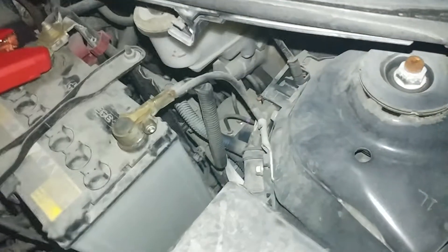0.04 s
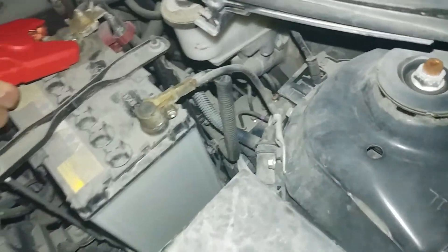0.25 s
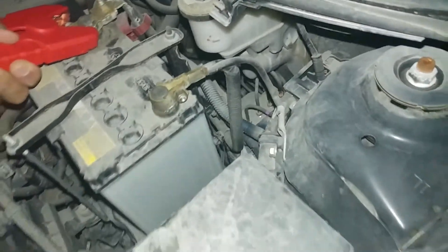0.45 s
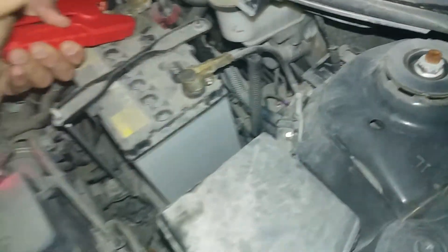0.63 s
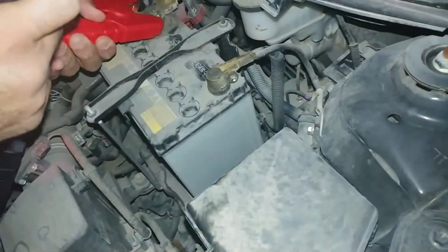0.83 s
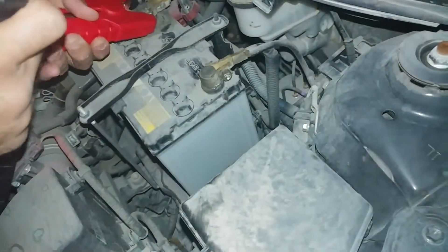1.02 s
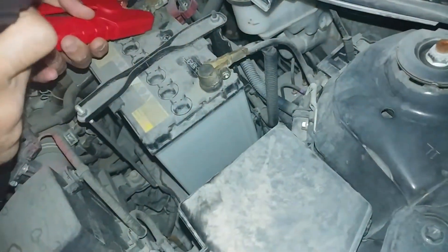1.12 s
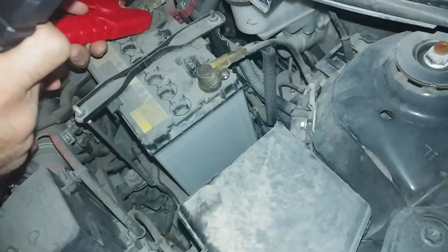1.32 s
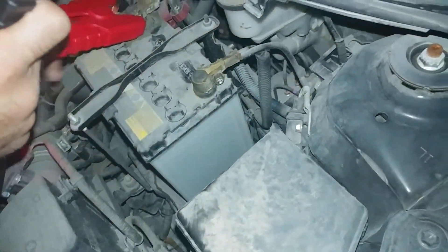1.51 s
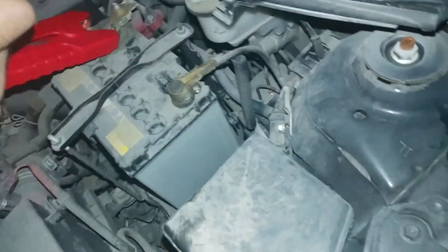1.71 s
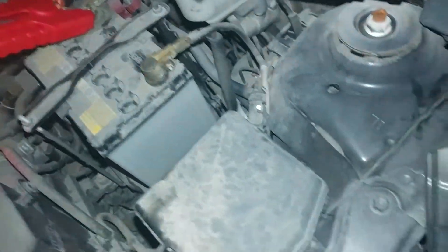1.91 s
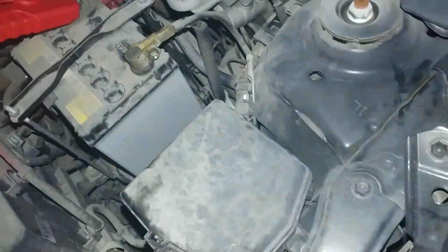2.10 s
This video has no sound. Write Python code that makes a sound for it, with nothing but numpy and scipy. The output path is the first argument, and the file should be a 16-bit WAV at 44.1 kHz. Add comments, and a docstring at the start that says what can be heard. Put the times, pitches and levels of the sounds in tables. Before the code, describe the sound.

Close to the microphone, a jumper clamp's jaws close with one sharp, briefly ringing snap. The grip scuffs, small taps and a knock sound on the car battery, and a cable slides faintly, with a low rumble underneath.

```python
"""Jumper clamp over an engine bay

The sprung jaws of a plastic clamp slip and snap shut once, ringing briefly and shaking the panels.
Light taps and a dull knock ring the battery case. The grip scuffs; a thin sliding hiss, probably
the cable, whistles faintly. A low rumble and a weak hum lie under it all."""
import sys
import numpy as np
from scipy import signal
from scipy.fft import rfft, irfft, next_fast_len
from scipy.io import wavfile
from scipy.ndimage import uniform_filter1d

SR = 44100
rng = np.random.default_rng(int(sys.argv[2]) if len(sys.argv) > 2 else 0)


def to_wav(s):
    """Save 16-bit WAV."""
    ch = np.atleast_2d(s).T  # columns
    pcm = np.round(np.clip(ch, -1, 1) * 32767)  # PCM
    wavfile.write(sys.argv[1], SR, pcm.astype(np.int16))


N = 94815
TIME_S = np.arange(N) / SR

# left-right correlation of the diffuse sound: f/Hz, coefficient
DIFFUSE_CORRELATION = [(60, 1), (130, 0.9), (290, .83), (640, 0.24), (1400, 0.096), (3000, 0.28),
                       (15000, -0.84)]
# rumble, then its deepest part: f/Hz, relative density/dB
RUMBLE_SPECTRUM = [(110, -12), (174, -19), (223, -17), (256, -19), (305, -15), (347, -22.5), (390, -20),
                   (482, -25.5), (792, -27), (1230, -38), (1860, -43), (2590, -49), (6000, -55.5),
                   (16000, -59)]
BASS_SPECTRUM = [(38, -6.5), (50, -2.5), (62, -2), (80, 1), (100, 1), (125, -5.5)]
# swell of deep rumble and hum: t/s, level/dB
BASS_ENVELOPE = [(0, -45.5), (0.09, -54.5), (0.14, -42), (0.2, -51.5), (0.27, -41.5), (0.34, -47),
                 (0.41, -46), (0.48, -50.5), (0.535, -43), (0.635, -54), (0.69, -44), (0.89, -52.5),
                 (0.98, -43.5), (1.11, -47), (1.25, -46), (1.5, -53), (1.8, -50), (2.15, -48.5)]

# sliding hiss: t/s, middle level/dB, top level/dB
SLIDE_ENVELOPE = [(0, -67.5, -70), (0.11, -77.5, -84), (0.19, -64.5, -74), (0.3, -65.5, -78.5),
                  (0.47, -82, -84), (0.76, -79.5, -80), (0.82, -73.5, -83), (0.98, -64, -82),
                  (1.05, -72.5, -72.5), (1.12, -69.5, -66.5), (1.22, -66, -63), (1.42, -66.5, -62),
                  (1.61, -73, -79), (1.76, -73.5, -76.5), (1.87, -77, -85.5), (2.15, -82, -91)]
# its middle and top bands: f/Hz, relative density/dB
SLIDE_MIDDLE_SPECTRUM = [(2000, -7.5), (3800, -5), (4400, 0.5), (5100, -5.5), (6200, -1.5), (7400, -5.5),
                         (8300, -5.5), (9250, 2.5), (10300, -10), (12000, -26.5)]
SLIDE_TOP_SPECTRUM = [(8000, -25), (10500, -13), (12500, -2.5), (13700, -1.5), (14600, 0.5), (15800, -4.5)]
# friction resonances: peak t/s, length/s, f/Hz, half-width/Hz, level/dB
SLIDE_WHISTLES = [(1.172, .28, 4360, 260, -72.5), (1.181, 0.21, 9400, 330, -68.5),
                  (1.384, 0.31, 9010, 699, -66.5), (1.537, 0.18, 6050, 297.6, -75),
                  (1.553, .24, 14300, 700, -68), (1.696, 0.21, 12750, 900, -71.5)]
# grip on plastic: t/s, level/dB
SCUFF_ENVELOPE = [(0, -63.5), (0.1, -73), (0.29, -58), (0.315, -49), (0.342, -66), (0.362, -48.5),
                  (0.386, -44.5), (0.408, -52), (0.418, -62), (0.436, -57), (0.47, -73.5), (0.76, -74),
                  (0.82, -61.5), (0.89, -66), (0.98, -61), (1.03, -62), (1.08, -77.5)]
# scuff, soft bump: f/Hz, relative density/dB
SCUFF_SPECTRUM = [(300, -15), (800, -4), (1080, -3), (1400, 7), (1650, 2), (1950, 5), (3300, -14),
                  (6000, -23), (9500, -23), (11000, -32.5), (16000, -34.5)]
THUD_SPECTRUM = [(110, 0), (220, -1), (330, 0), (480, -10)]
# soft bumps: t/s, level/dB
THUD_HITS = [(0.283, -40), (0.685, -39), (1.152, -45), (1.195, -47)]

# clamp on battery, the last a knock: t/s, clack level/dB, tick level/dB, case gain/dB
TAP_HITS = [(0.149, -53, -57, -34), (0.4221, -42, -70, -12), (0.6798, -37.5, -58, -19),
            (0.6898, -46, -70, -25), (0.76, -60.5, -63.5, -35), (0.9936, -45.5, -46, 1.5)]
# clack, tick, dull after-ring: f/Hz, relative density/dB
CLACK_SPECTRUM = [(150, -0.5), (350, -3.5), (700, -11), (1100, -9), (1600, 5.5), (2100, -5), (2800, -18.5),
                  (5000, -29), (9000, -37.5)]
TICK_SPECTRUM = [(1500, -4), (3000, -2.5), (5500, 5.5), (7500, -2), (8700, 14), (10000, 16), (11000, 2),
                 (12500, 4), (16000, -10)]
AFTER_RING_SPECTRUM = [(300, -6), (500, 5), (800, 5.5), (1200, -9), (2200, -20.5), (4000, -27.5)]
# battery case: f/Hz, level/dB, T60/s
CASE_MODES = [(505, -42, 0.05), (587, -38, 0.09), (694, -43, 0.07), (851, -39, 0.075), (1141, -54, 0.06)]

# panels and cavities: f/Hz, level/dB, T60/s, delay/s
PANEL_MODES = [(58, -33.5, 0.19, 0.012), (250, -29, 0.15, .011), (280, -30, 0.11, .012),
               (385, -41, 0.14, .01), (500, -32, 0.075, .001), (666, -33, .08, .014), (1000, -27, .06, 0)]
# bay reflections, far tail: f/Hz, relative density/dB
BAY_SPECTRUM = [(200, -9), (600, -4), (1200, -1), (2000, 1), (3200, -10.5), (5500, -9.5), (8000, -11.5),
                (9300, -9), (10500, -40), (14500, -28), (16000, -35.5)]
FAR_TAIL_SPECTRUM = [(200, 2.5), (1000, 2.5), (2000, -0.5), (3500, -7.5), (9500, -13.5), (11000, -28.5),
                     (16000, -26.5)]
# decay of the reflections: f/Hz, T60/s
BAY_DECAY = [(200, 0.14), (1000, 0.085), (2000, .08), (5000, 0.065), (14000, 0.097)]

# slip, then slam: t/s, ring gain/dB, slope away from the jaw pitch/(dB/octave), chatter level/dB
JAW_SNAPS = [(0.2247, -7.5, -7, -29), (0.2288, -5, -1, -14.5)]
# clamp shell: f/Hz, left level/dB, right level/dB, T60/s
CLAMP_MODES = [(1037, -20.5, -31, .04), (1144, -26.5, -22, .05), (1430, -26, -20, .05),
               (1640, -23.5, -16, 0.062), (1870, -24.5, -6, 0.055), (2060, -16.5, -4.5, 0.032),
               (2308, -7, -14.5, .035), (2550, -13, -22, 0.031), (2790, -24, -26, 0.047),
               (2952, -18, -22.5, 0.022), (4900, -12, -20, .018), (5520, -19, -13, 0.022),
               (6530, -19, -15.5, .014)]
# teeth meet and rebound: t/s, left level/dB, right level/dB
TOOTH_HITS = [(0.22860, -10, -14.5), (0.2289, -4, -3), (0.2294, -10.5, -8), (0.2302, -9, -11),
              (0.2311, -13, -14)]
# clicks and chatter of the teeth: f/Hz, relative density/dB
TOOTH_SPECTRUM = [(300, -25), (700, -12.5), (1340, -10), (1750, -4.5), (2250, 0), (3100, -11), (4100, -6.5),
                  (5600, -3.5), (6600, -5), (7500, -10.5), (8600, -5), (9700, -6.5), (10500, -34),
                  (12500, -26), (14200, -15.5), (16000, -26)]

HAND_LAG_S = .00036   # the hand is nearer the left microphone


def amp(db):
    """Decibels to gain."""
    return 10 ** (np.asarray(db) / 20)


def unit_rms(x):
    """Scale to unit power."""
    return x / np.sqrt(np.mean(x ** 2) + 1e-20)


def at_hz(table, hz):
    """Interpolate a table over log frequency."""
    table_hz, values = np.transpose(table)
    return np.interp(np.log(np.maximum(hz, 1)), np.log(table_hz), values)


def in_time(table):
    """Interpolate each column linearly over time."""
    times_s, *columns = np.transpose(table)
    return [np.interp(TIME_S, times_s, column) for column in columns]


def drift(rate_hz):
    """Low-passed random wander, unit RMS."""
    pole = np.exp(-2 * np.pi * rate_hz / SR)
    wander = signal.lfilter([1], [1, -2 * pole, pole * pole], rng.standard_normal(N + SR))
    return unit_rms(wander[SR:])


def noise(spectrum, correlation, lag_s=0, left_db=0):
    """Unit-RMS stereo noise, falling 12 dB/octave outside its spectrum; the right side may lag."""
    size = next_fast_len(N)
    hz = np.arange(size // 2 + 1) * SR / size + 1
    skirts = np.minimum(hz / spectrum[0][0], 1) ** 2 * np.minimum(spectrum[-1][0] / hz, 1) ** 2
    gain = amp(at_hz(spectrum, hz)) * skirts
    alike = np.clip(at_hz(correlation, hz) if np.ndim(correlation) else correlation, -1, 1)
    mid, side = rfft(rng.standard_normal((2, size))) * gain
    mid, side = mid * np.sqrt(1 + alike), side * np.sqrt(1 - alike)
    left = (mid + side) * amp(left_db)
    right = (mid - side) * np.exp(-2j * np.pi * hz * lag_s)
    return unit_rms(irfft(np.array([left, right]), size)[:, :N])


def decay(start_s, db, t60_s):
    """Envelope of a blow: sudden start, exponential fall."""
    return (TIME_S >= start_s) * amp(db - 60 * np.clip((TIME_S - start_s) / t60_s, 0, 3))


def ring(start_s, hz, db, t60_s):
    """One struck mode."""
    return decay(start_s, db, t60_s) * np.sin(2 * np.pi * hz * (TIME_S - start_s))


def click(spectrum, size=4096):
    """Minimum-phase pulse of a given spectrum, peak 1."""
    hz = np.arange(size // 2 + 1) * SR / size
    cepstrum = irfft(np.log(amp(at_hz(spectrum, hz))))
    cepstrum[1:size // 2] *= 2
    cepstrum[size // 2 + 1:] = 0
    pulse = irfft(np.exp(rfft(cepstrum)))
    return pulse / np.abs(pulse).max()


def rumble(steady_db=-51, deep_gain_db=-1, hum_gain_db=-2, hum_hz=61.3):
    """Steady rumble; its deepest part and a weak hum swell and sink together."""
    swell_db, = in_time(BASS_ENVELOPE)
    hum_phase = 2 * np.pi * hum_hz * TIME_S + 1.6 * drift(rate_hz=3.7)
    hum = np.sqrt(2) * amp(hum_gain_db) * np.sin(hum_phase)
    deep = amp(deep_gain_db) * noise(BASS_SPECTRUM, 0.97)
    steady = amp(steady_db) * noise(RUMBLE_SPECTRUM, DIFFUSE_CORRELATION)
    return steady + amp(swell_db) * (deep + hum)


def whistles():
    """Narrow friction resonances swell and fade during the slide."""
    out = 0
    for peak_s, length_s, hz, width_hz, db in SLIDE_WHISTLES:
        spectrum = [(hz - 3 * width_hz, -40), (hz - width_hz, -12), (hz, 0),
                    (hz + width_hz, -12), (hz + 3 * width_hz, -40)]
        swell = amp(db) * np.exp(-(2 * (TIME_S - peak_s) / length_s) ** 2)
        out += swell * noise(spectrum, 0.17, left_db=4.5)
    return out


def sliding_hiss(grain_db=0.5):
    """Smooth sliding friction: two noise bands share a slight flicker."""
    middle_db, top_db = in_time(SLIDE_ENVELOPE)
    flicker_db = grain_db * drift(rate_hz=40)
    middle = amp(middle_db + flicker_db) * noise(SLIDE_MIDDLE_SPECTRUM, 0.38, HAND_LAG_S, left_db=1.5)
    top = amp(top_db + flicker_db) * noise(SLIDE_TOP_SPECTRUM, 0.24, HAND_LAG_S)
    return middle + top


def grip_scuff(grain_db=1.2):
    """Grainy friction of the grip on the plastic."""
    scuff_db, = in_time(SCUFF_ENVELOPE)
    envelope = amp(scuff_db + grain_db * drift(rate_hz=120))
    return envelope * noise(SCUFF_SPECTRUM, 0.11, HAND_LAG_S, left_db=-5.5)


def thuds(attack_s=.004, t60_s=.13):
    """Low, soft bumps, probably of hand and cable."""
    blows = sum(decay(start_s, db, t60_s) for start_s, db in THUD_HITS)
    envelope = uniform_filter1d(blows, int(attack_s * SR))
    return envelope * noise(THUD_SPECTRUM, DIFFUSE_CORRELATION)


def battery_taps(case_delay_s=0.00185, after_ring_db=-46):
    """Each contact clacks, ticks and rings the battery case, leaving a dull after-ring."""
    clack, tick, case, after_ring = np.zeros((4, N))
    for start_s, clack_db, tick_db, case_db in TAP_HITS:
        clack += decay(start_s, clack_db, t60_s=0.032)
        tick += decay(start_s, tick_db, t60_s=.04)
        after_ring += decay(start_s, case_db + after_ring_db, t60_s=0.24)
        for hz, mode_db, t60_s in CASE_MODES:
            case += ring(start_s + case_delay_s, hz, case_db + mode_db, t60_s)
    return (case + clack * noise(CLACK_SPECTRUM, 0.65, HAND_LAG_S, left_db=-0.35)
            + tick * noise(TICK_SPECTRUM, 0.44, HAND_LAG_S)
            + after_ring * noise(AFTER_RING_SPECTRUM, DIFFUSE_CORRELATION))


def engine_bay(scatter_db=-14.5, tail_db=-43.5):
    """The slam shakes the panels, the heavy ones last, and scatters about the bay; lows last longest."""
    slam_s = JAW_SNAPS[-1][0]
    panels = sum(ring(slam_s + delay_s, hz, db, t60_s) for hz, db, t60_s, delay_s in PANEL_MODES)
    scatter = noise(BAY_SPECTRUM, DIFFUSE_CORRELATION, left_db=-1.5)
    edges_hz = np.geomspace(140, 17000, 8)
    reflections = 0
    for low_hz, high_hz in zip(edges_hz, edges_hz[1:]):
        bandpass = signal.butter(2, [low_hz, high_hz], "band", fs=SR, output="sos")
        t60_s = at_hz(BAY_DECAY, np.sqrt(low_hz * high_hz))
        reflections += signal.sosfilt(bandpass, scatter) * decay(slam_s, scatter_db, t60_s)
    far_tail = noise(FAR_TAIL_SPECTRUM, DIFFUSE_CORRELATION) * decay(slam_s, tail_db, t60_s=0.41)
    return panels + reflections + far_tail


def clamp_teeth(chatter_t60_s=0.024):
    """The teeth chatter at slip and slam; hard clicks as they meet and rebound."""
    hits = np.zeros((2, N))
    for start_s, left_db, right_db in TOOTH_HITS:
        hits[0, int(start_s * SR)] += amp(left_db)
        hits[1, int((start_s + HAND_LAG_S) * SR)] += amp(right_db)
    clicks = signal.fftconvolve(hits, click(TOOTH_SPECTRUM)[None], axes=1)[:, :N]
    chatter = sum(decay(start_s, db, chatter_t60_s) for start_s, _, _, db in JAW_SNAPS)
    return clicks + chatter * noise(TOOTH_SPECTRUM, 0.14, HAND_LAG_S, left_db=1)


def clamp_shell(jaw_hz=2100, radiates_above_hz=780):
    """Slip and slam ring the clamp's modes; the small shell gives off little bass."""
    left, right = np.zeros((2, N))
    for start_s, ring_db, db_per_octave, _ in JAW_SNAPS:
        for hz, left_db, right_db, t60_s in CLAMP_MODES:
            drive_db = ring_db + db_per_octave * abs(np.log2(hz / jaw_hz))
            left += ring(start_s, hz, drive_db + left_db, t60_s)
            right += ring(start_s + HAND_LAG_S, hz, drive_db + right_db, t60_s)
    highpass = signal.butter(4, radiates_above_hz, "high", fs=SR, output="sos")
    return signal.sosfilt(highpass, [left, right])


def scene():
    """Stereo sum of all sources."""
    snap = clamp_shell() + clamp_teeth() + engine_bay()
    return snap + battery_taps() + thuds() + sliding_hiss() + grip_scuff() + whistles() + rumble()


def record(dry):
    """Band-limit, then clip at full scale."""
    low_cut_hz, high_cut_hz = 30, 15900
    highpass = signal.butter(8, low_cut_hz, "high", fs=SR, output="sos")
    lowpass = signal.ellip(10, .2, 80, high_cut_hz, fs=SR, output="sos")
    return np.clip(signal.sosfilt(lowpass, signal.sosfilt(highpass, dry)), -1, 1)


dry = scene()
out = record(dry)
to_wav(out)
```